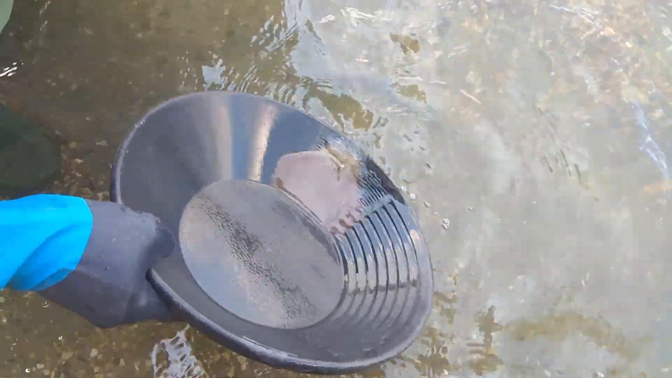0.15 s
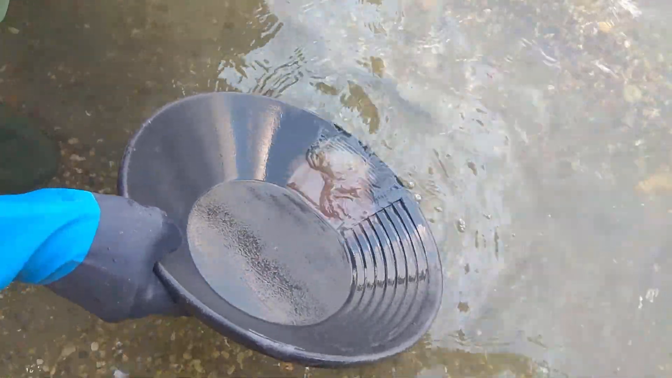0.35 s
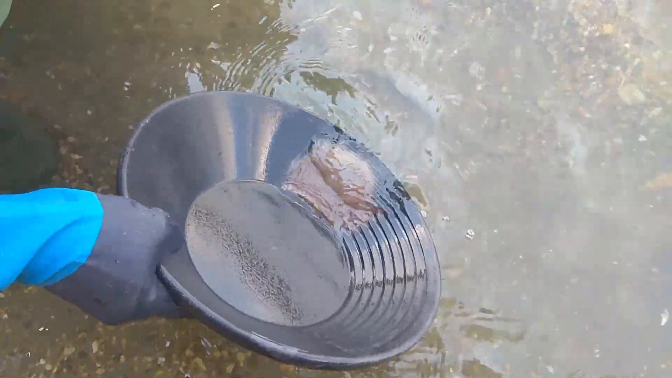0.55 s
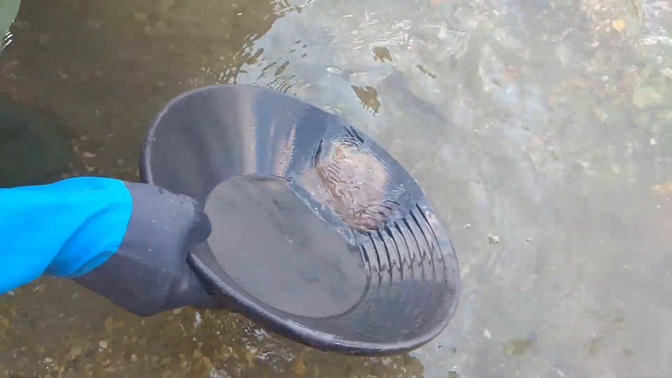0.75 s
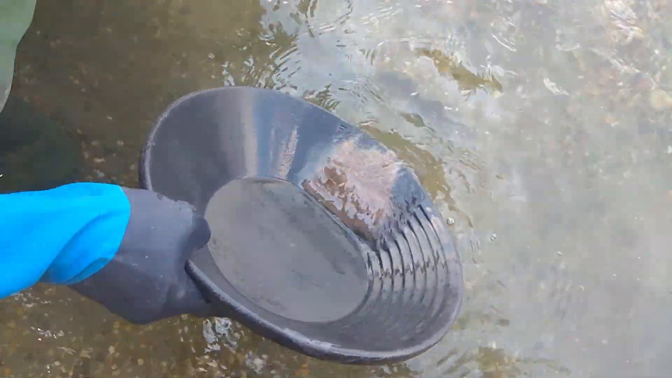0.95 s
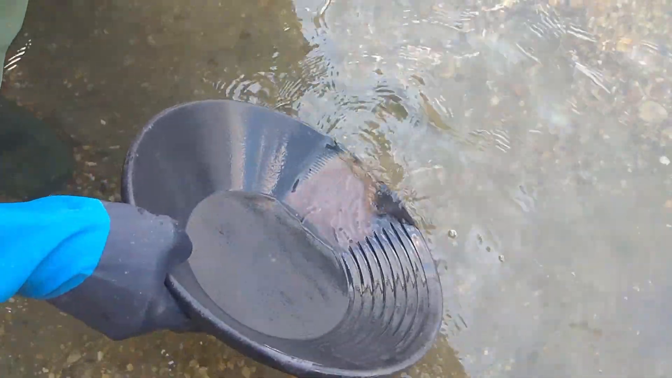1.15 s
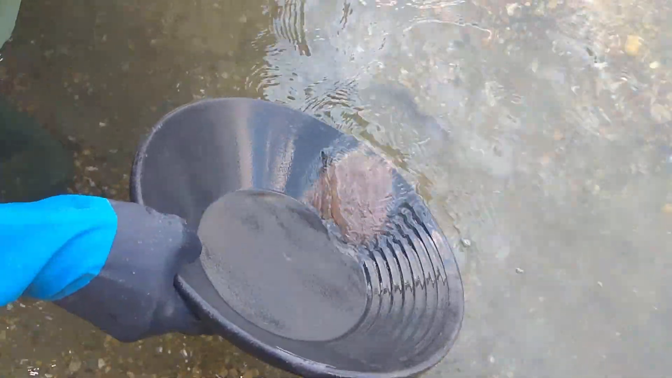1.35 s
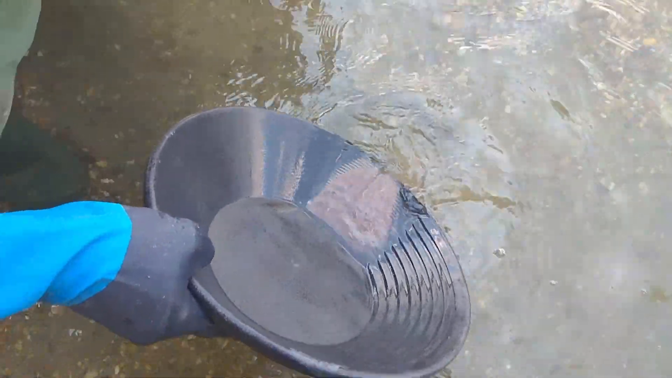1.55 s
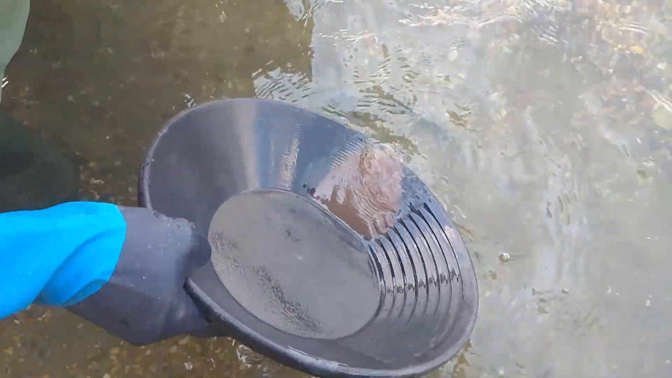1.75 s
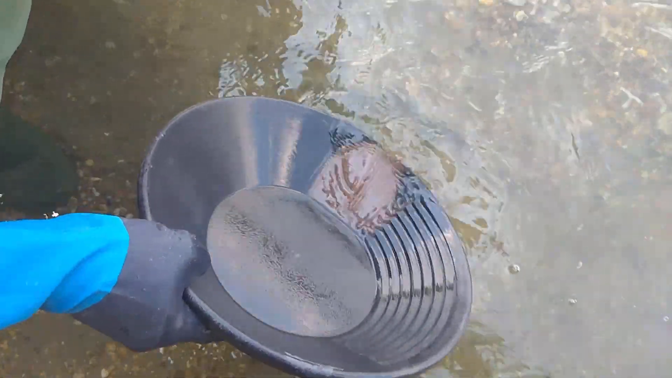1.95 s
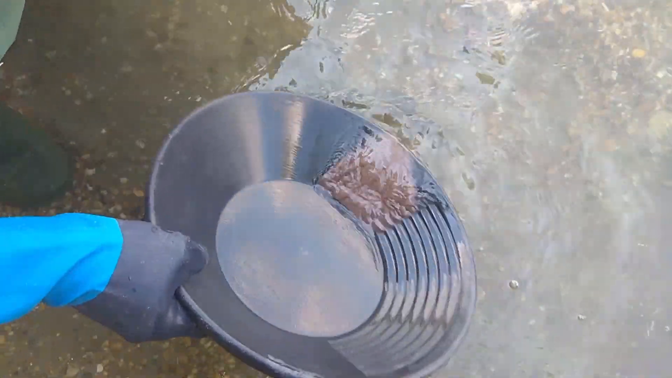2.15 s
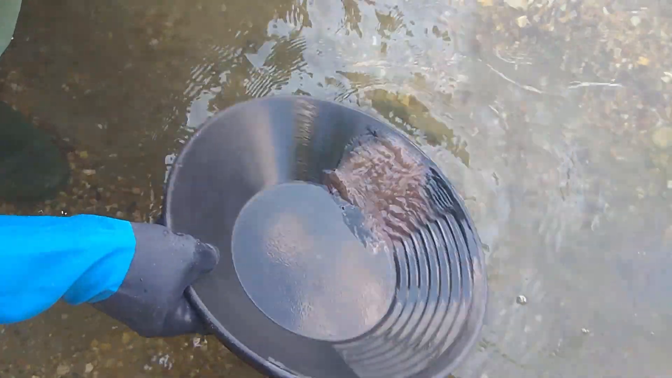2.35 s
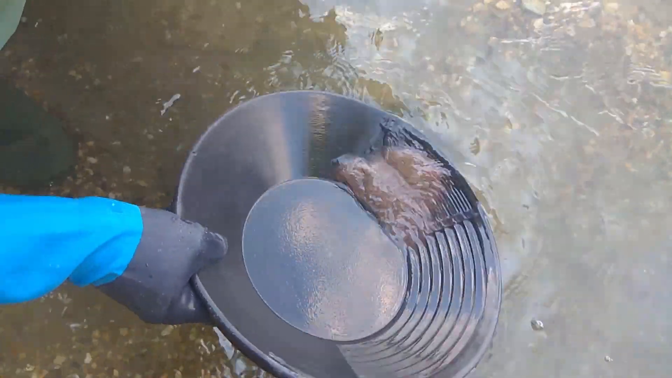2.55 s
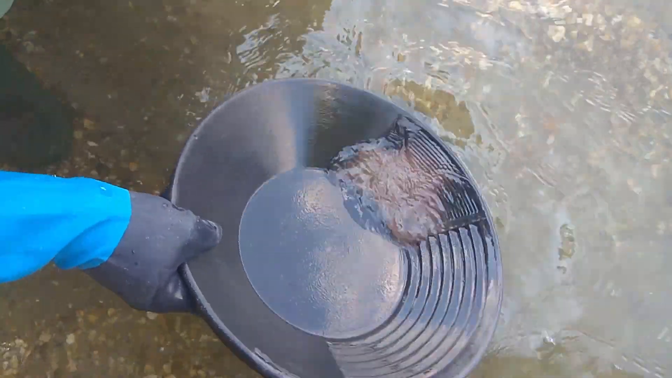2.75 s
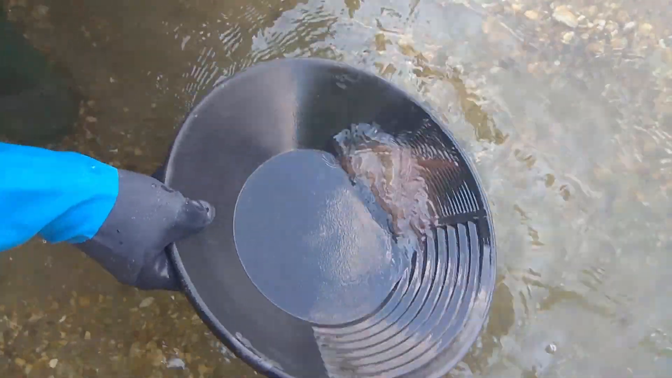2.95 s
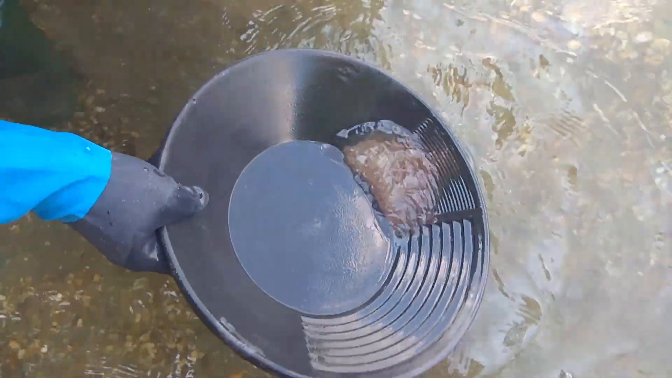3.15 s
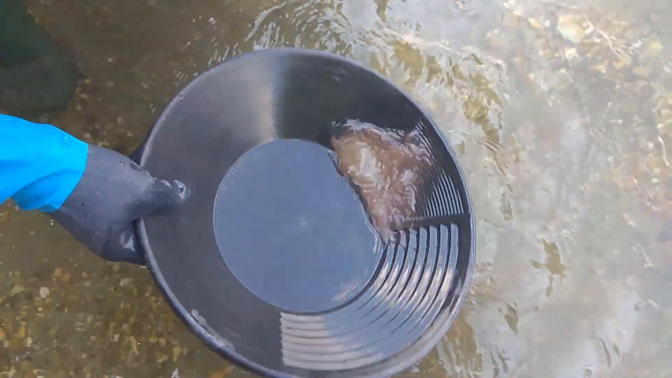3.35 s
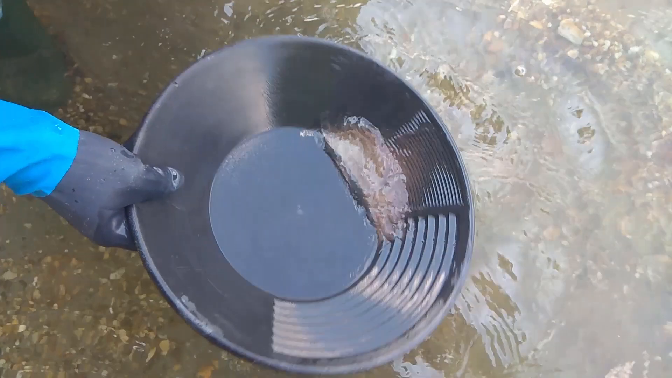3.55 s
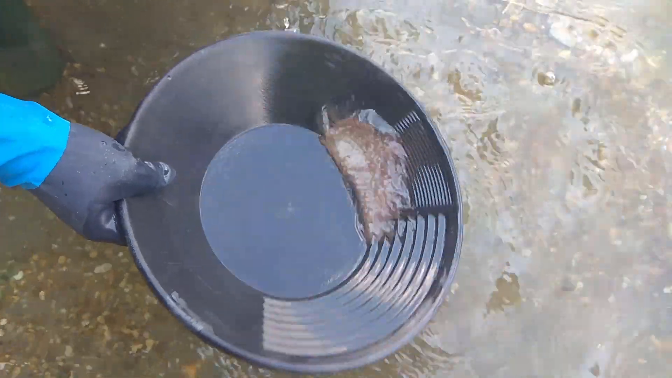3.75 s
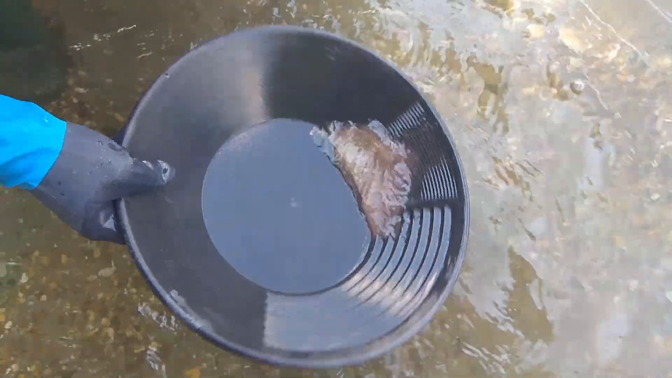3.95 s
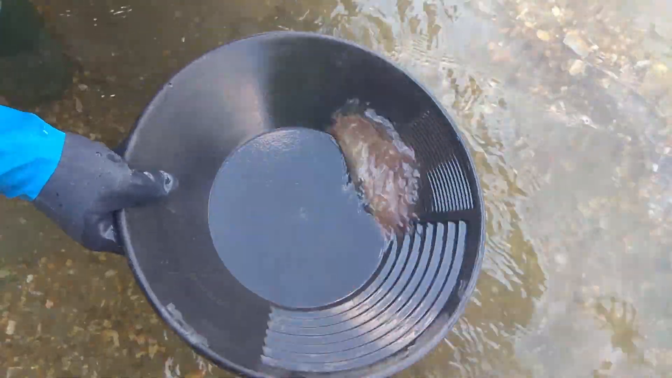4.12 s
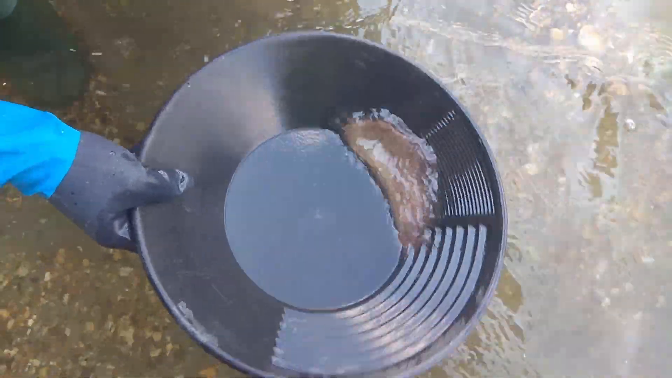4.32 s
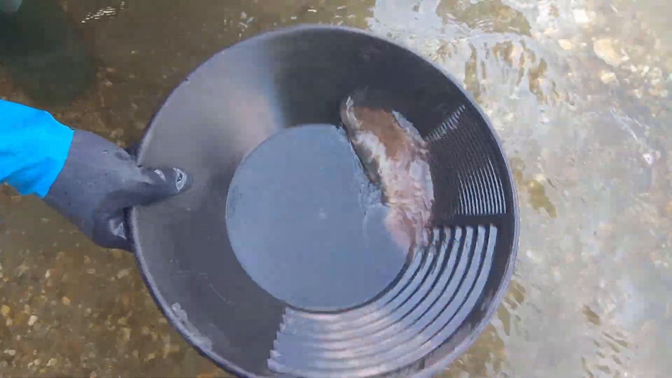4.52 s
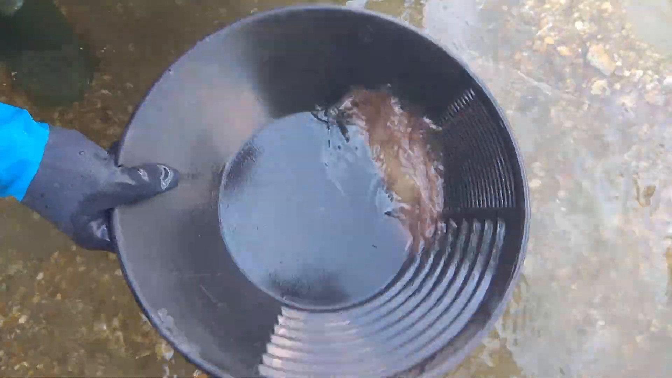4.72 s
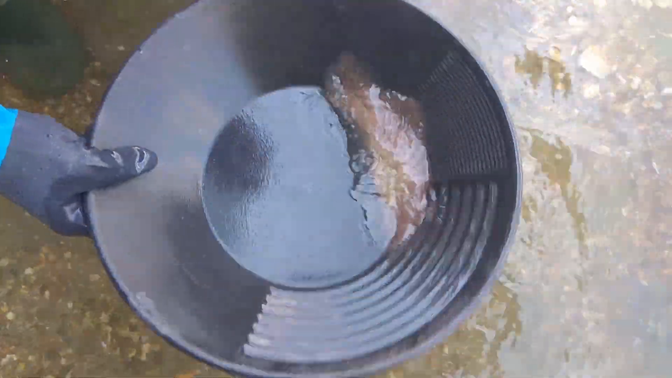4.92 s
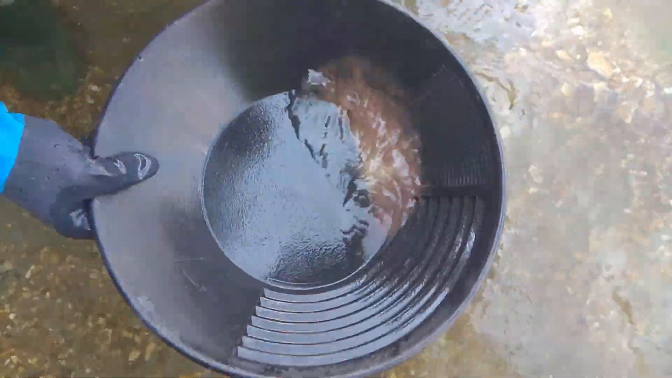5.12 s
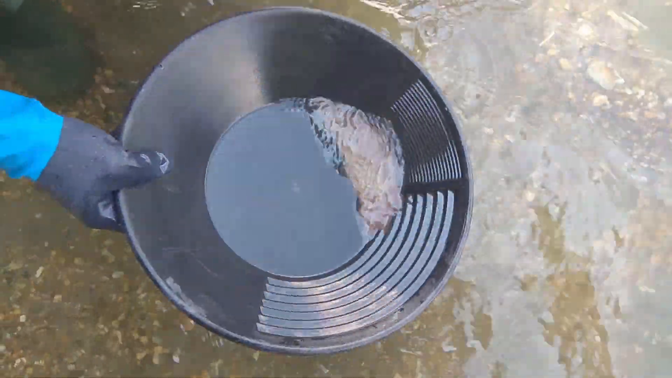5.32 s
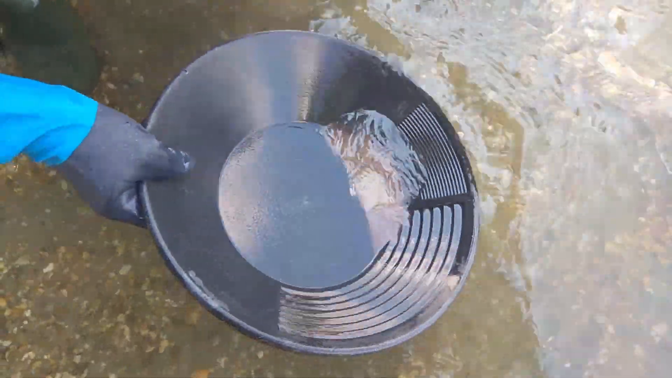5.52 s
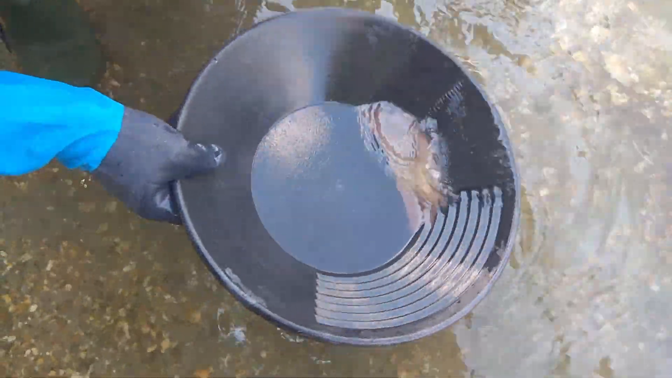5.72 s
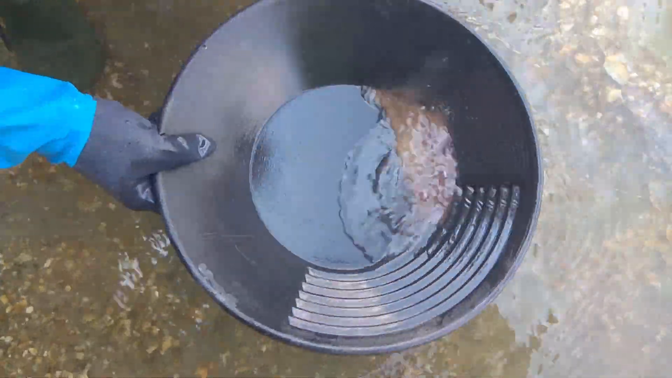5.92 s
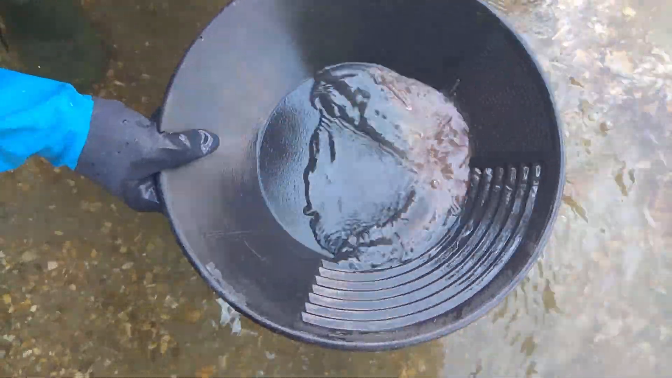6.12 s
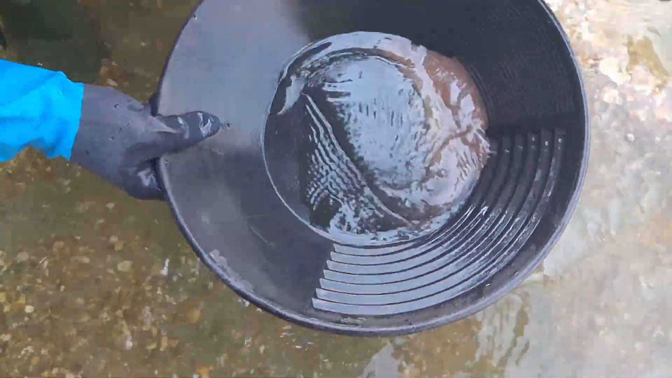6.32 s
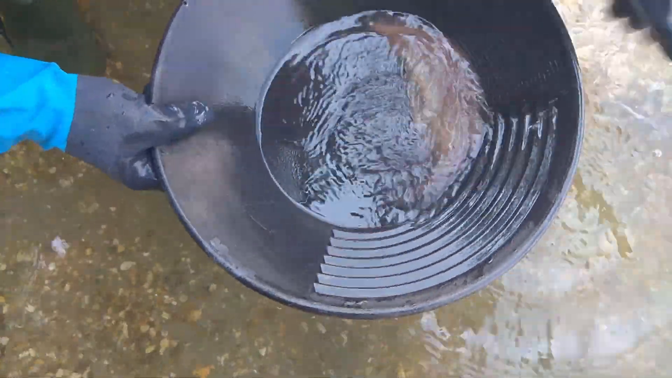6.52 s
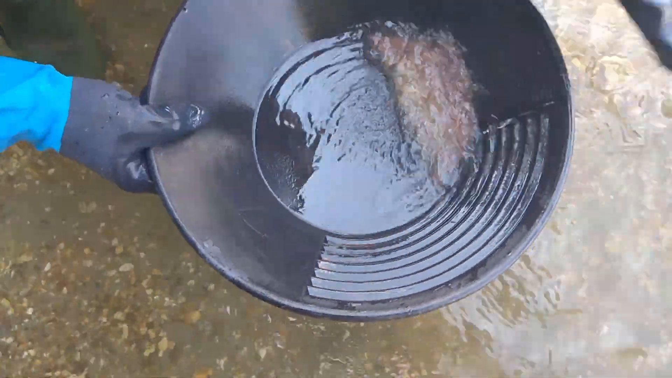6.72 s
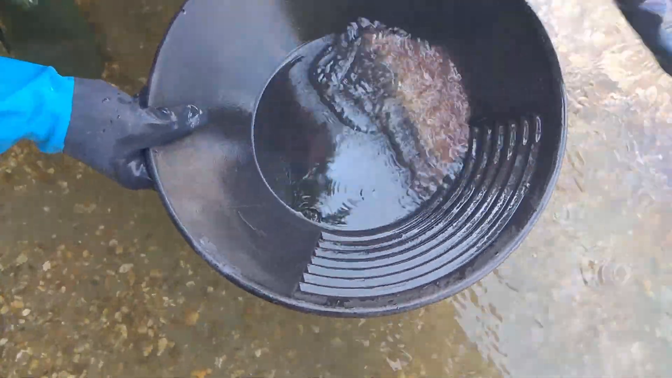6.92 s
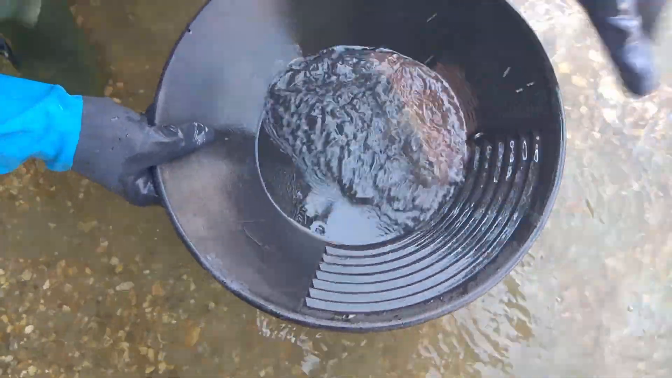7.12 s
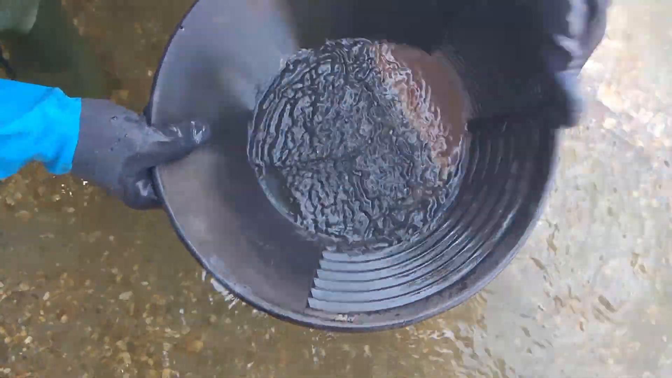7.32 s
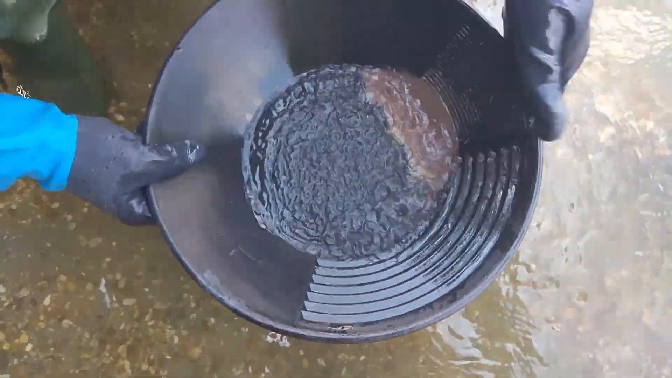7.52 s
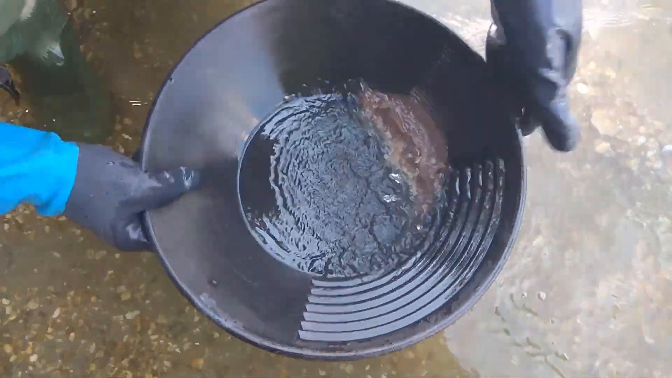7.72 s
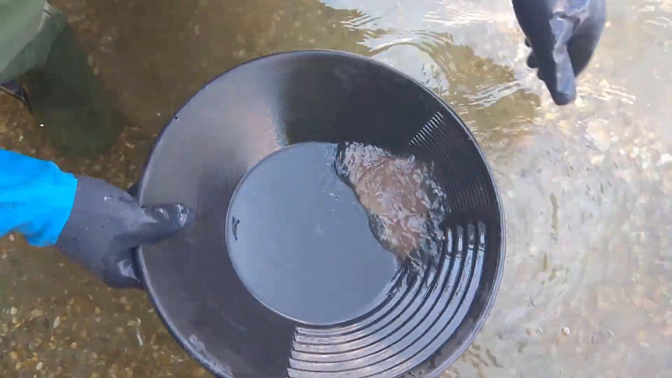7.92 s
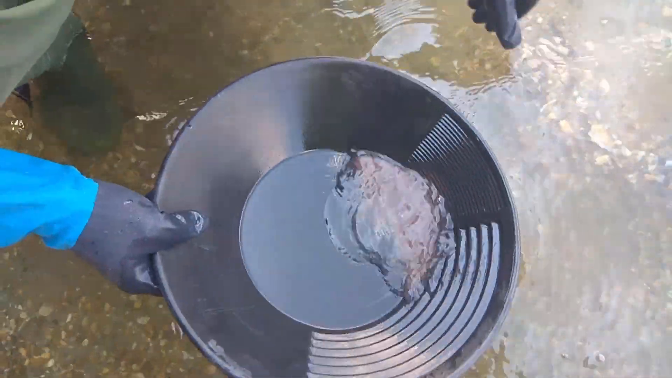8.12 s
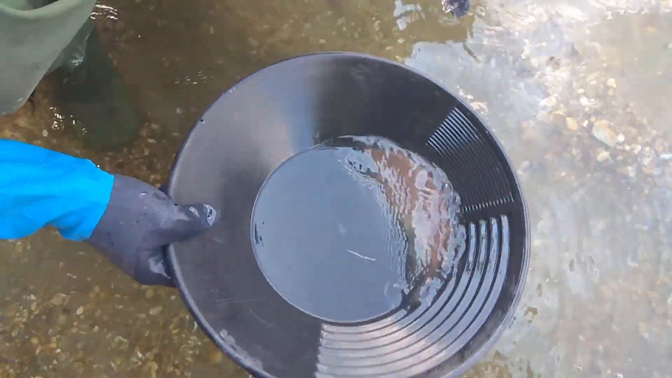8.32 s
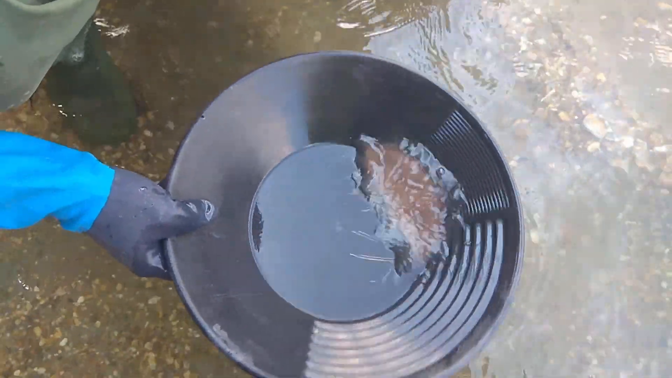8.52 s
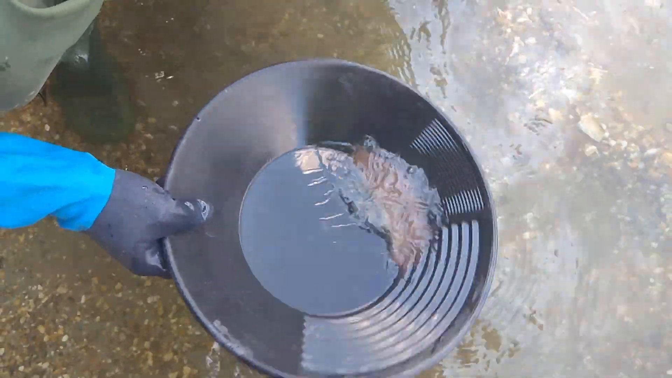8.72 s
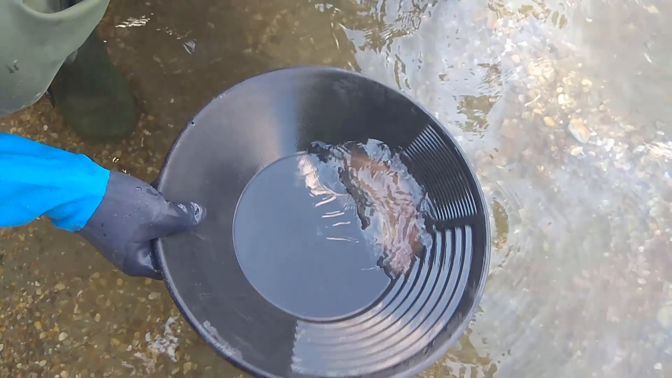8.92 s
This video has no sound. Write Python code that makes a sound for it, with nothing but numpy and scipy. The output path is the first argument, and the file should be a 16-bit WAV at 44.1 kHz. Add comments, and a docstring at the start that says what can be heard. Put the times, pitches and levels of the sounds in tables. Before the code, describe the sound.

A distant bird trills while water begins to lap at a plastic pan. A strong splash and gurgling, fizzing pours come first, then lighter plops, ringing bubbles and a quiet swirl of sand. Eight evenly spaced wet, hollow knocks on the rim shake water back into the pan, and gentle washes and drips end it. Outdoors on a shallow stream, heard very close in stereo.

```python
"""Water washes over the riffles of a plastic gold pan, spills, splashes and drips, close to a stereo microphone.
The pan is dipped and swirled in a shallow river: bubble clouds and spiky noise make the water, narrow noise the sand.
A wet gloved hand raps the rim eight times: slapped noise, ringing pan modes, then the slop of water falling back.
Underneath, the current rushes softly as low noise; far off, birds trill and whistle as gliding narrow noise."""
import sys
import numpy as np
from scipy import signal
from scipy.fft import rfft, irfft, next_fast_len
from scipy.io import wavfile
from scipy.ndimage import uniform_filter1d, map_coordinates

SR = 44100
rng = np.random.default_rng(int(sys.argv[2]) if len(sys.argv) > 2 else 0)


def inscribe(sig):
    """Save sig as 16-bit PCM at rate SR to the path in sys.argv[1].

    A 1-D sig is mono; a 2-D sig holds one channel per row.
    Samples are clipped to [-1, 1] before scaling.
    """
    pcm = np.round(np.clip(np.atleast_2d(sig).T, -1, 1) * 32767)
    wavfile.write(sys.argv[1], SR, pcm.astype(np.int16))


N = 399972

# Levels in the tables are settings; the functions trim or vary many of them. Waves over the riffles, most from
# a rock of the pan; the long one from 6.56 s is water stirred by the raps: (crest [s], rise [s], hold [s],
# level [dB], brightness [dB])
RIFFLE_WAVES = [(1.103, 0.14, 0.15, -47.5, -1), (1.384, 0.2, 0.044, -35, -6.5), (2.025, 0.11, 0.2, -46, -1),
                (2.352, 0.073, 0.086, -40.5, -3.5), (2.722, 0.2, 0.31, -52.5, -8),
                (3.466, 0.054, 0.036, -54, 1), (3.815, 0.066, 0.017, -59, 8.5),
                (5.302, 0.067, 0.0095, -43, 0.5), (5.446, 0.017, 0.015, -56, 10),
                (5.915, 0.0056, 0.0125, -55.5, 3.5), (6.063, 0.148, .2, -61.5, -2.5),
                (6.56, 0.12, 1.213, -70, 2.5), (7.759, 0.16, 0.032, -48.5, -5.5),
                (8.256, 0.1, 0.016, -91.5, 31), (8.796, 0.15, 0.08, -51, -0.5)]
RISE_DB, DRAIN_DB_PER_S = 19, 122  # climb within the rise time; fall after the hold
WAVE_GURGLE_DB, WAVE_FIZZ_DB = -14.5, -2  # against the babble; brightness trades gurgle for fizz
# Stream spilling over the lip while the pan is tipped: (time [s], flow [dB])
LIP_FLOW = [(0.92, -89.5), (1.02, -52), (1.27, -80), (1.4, -49.5), (2.6, -50), (3.15, -55.5), (4.14, -63.5),
            (4.42, -84)]
FULL_FLOW_DB = -50
POUR_BABBLE_DB, POUR_FIZZ_DB = -48.5, -60.5  # at full flow
BABBLE_GROWS, FIZZ_GROWS = 4.5, 0.55  # dB gained for each dB of flow
DROPLETS_DB = -3  # fine droplets against the wash that throws them
# Narrow bands of wash sliding down as a wave drains:
# (start [s], length [s], first pitch [Hz], last pitch [Hz], level [dB])
DRAINING_SLIDES = [(2.34, 0.33, 894.5, 576.6, -49), (2.6, 0.27, 3400, 2350, -48)]
SLIDE_WIDTH_HZ = 210
# Sand circling the pan floor: (time [s], level [dB])
SAND_LEVEL = [(4.2, -62), (5.8, -97), (6.1, -53), (6.45, -69), (7.82, -66.5), (8.2, -87), (8.6, -56.5)]
# Broad resonances of the dish: (centre [Hz], width [Hz], level [dB])
DISH_RESONANCES = [(1450, 190, 2), (2100, 260, -5), (3900, 600, -10)]
# Water slapping and dripping: (time [s], spray level [dB], body level [dB])
SPLASH_HITS = [(0.663, -29.5, -40), (1.1073, -19, -40), (1.1314, -22, -45.5), (1.217, -22, -56.5),
               (1.2455, -23, -51), (1.3221, -3, -12.5), (1.726, -42, -24.5), (1.8157, -26, -31),
               (2.0119, -15, -35.5), (2.3859, -13, -32.5), (2.5277, -16.5, -29), (2.7198, -23, -21.5),
               (2.875, -27.5, -28.5), (3.4252, -27, -40), (3.4498, -22.5, -46), (3.5637, -25, -40.5),
               (3.7247, -29, -38.5), (3.7956, -28, -43.5), (3.8288, -28.5, -30.5), (3.836, -23, -59),
               (3.906, -37.5, -37), (3.942, -32, -48), (4.0962, -39.5, -26.5), (4.8266, -33, -60),
               (5.34, -33.5, -32.5), (5.4611, -10.5, -20.5), (5.9653, -27, -35.5), (6.036, -18, -49),
               (6.353, -31, -95), (8.562, -21, -35.5), (8.5921, -24, -50), (8.8265, -23.5, -38.5),
               (8.861, -26.5, -36.5)]
# Small drops bursting on the plastic: (time [s], level [dB])
DROP_TICKS = [(0.275, -28), (1.1535, -25.5), (1.27, -23.5), (2.194, -25), (3.4857, -25), (3.9833, -23),
              (7.073, -27.5), (8.582, -29.5), (8.7567, -30), (8.988, -31)]
TICK_S = 0.0012  # time constant of a burst's decay
# Single ringing bubbles: (time [s], level [dB], starting pitch [Hz], 60 dB decay [s])
RINGING_BUBBLES = [(1.131, -25.5, 1990, 0.039), (1.189, -24, 3660, 0.019), (1.82, -25, 1220, 0.042),
                   (2.198, -29.5, 1107, 0.048), (2.386, -23.5, 414, 0.018), (3.453, -24.5, 3860, 0.026),
                   (3.748, -26.5, 2050, 0.021), (4.004, -28, 626, 0.04), (4.005, -24, 1180, 0.016),
                   (4.007, -27, 1830, 0.025), (4.237, -37, 4700, 0.017), (5.311, -40, 847, 0.057),
                   (5.464, -21, 2070, 0.026), (5.93, -35.5, 768, 0.14), (5.933, -37.5, 1650, 0.079),
                   (5.969, -34, 1310, 0.079), (6.113, -38, 4290, 0.03), (6.355, -34.5, 2414, 0.039),
                   (6.771, -29, 2370, 0.017), (8.401, -37, 4300, 0.0075), (8.473, -45, 1340, 0.079),
                   (8.507, -38.5, 1400, 0.017), (8.728, -30.5, 3400, 0.006), (8.828, -38.5, 890, 0.11),
                   (8.872, -35, 850, 0.026)]
# Raps on the rim: (time [s], smack level [dB], thump level [dB], slop level [dB], slop pitch [Hz])
RIM_RAPS = [(6.5105, -12, -21.5, -32.5, 657), (6.689, -7, -16, -35.5, 639), (6.847, -4.5, -10, -27.5, 706),
            (7.024, -6.5, -8.5, -30.5, 650), (7.194, -3, -6, -39.5, 748), (7.368, -8, -7, -21, 670),
            (7.538, -3.5, -5.5, -18, 647), (7.701, -5.5, -4, -18, 680)]
# Wet pan modes, before each rap's variation: (pitch [Hz], level [dB], 60 dB decay [s])
PAN_MODES = [(213.7, -14, 0.16), (279, 7, 0.025), (299.6, -9, 0.022), (526, 4.5, 0.018), (897, -10, 0.034),
             (1181, -2, 0.019), (1510, -7, 0.011)]
RAP_SPRAY_DB = -36  # spray falling back after every rap
# The river's low rush: (time [s], level [dB])
CURRENT_LEVEL = [(0.0, -52), (1.36, -48), (2.37, -61), (3.0, -46), (3.28, -56), (5.53, -46), (6.46, -54.5),
                 (6.72, -46), (7.63, -52.5), (7.96, -66.5), (8.92, -78.5), (9.05, -60)]
BLIPS_DB = -79  # ripples plipping round the pan
# Thin far bird whistles: (start [s], length [s], first pitch [Hz], last pitch [Hz], level [dB])
BIRD_WHISTLES = [(0, 0.21, 2154, 2220, -57.5), (3.13, 0.36, 3540, 4160, -67.5),
                 (4.404, 0.16, 1896, 2300, -67.5), (4.97, 0.16, 2650, 2220, -72),
                 (8.027, 0.34, 7860, 7500, -58)]
FIRST_NOTE_S, NOTE_S = 0.07, 0.212  # a trill note's start; spacing of the notes
TRILL_DB, TRILL_END_S = -52, 0.97  # the trill's fade starts at its end time

# Large bubbles, the gurgle's spectrum: (frequency [Hz], relative level [dB])
GURGLE_SPECTRUM = [(100, -23), (250, 2), (450, -5.5), (700, 0), (1200, -5.5), (1800, -26.5), (3500, -35)]
# Middling bubbles, the babble's spectrum: (frequency [Hz], relative level [dB])
BABBLE_SPECTRUM = [(600, -27), (1400, -7.5), (2200, -0.5), (3200, 0.5), (4800, 3.5), (7000, -28),
                   (12000, -31)]
# Tiny bubbles, the fizz's spectrum: (frequency [Hz], relative level [dB])
FIZZ_SPECTRUM = [(2500, -52.5), (5000, -3), (7000, -0.5), (9500, 4.5), (12000, -9), (14500, 1.5),
                 (16500, -28)]
# Hollow body of a splash: (frequency [Hz], relative level [dB])
BODY_SPECTRUM = [(100, -29), (300, -9.5), (600, -3), (1200, -6.5), (2100, 1.5), (3000, -9), (5000, -9),
                 (12000, -62.5)]
# Bright spray of splashes and drops: (frequency [Hz], relative level [dB])
SPRAY_SPECTRUM = [(1000, -39), (2800, -6), (5000, -4), (9000, 3.5), (12000, -5), (15000, -13.5),
                  (17000, -40)]
# Wet glove on the rim: (frequency [Hz], relative level [dB])
SMACK_SPECTRUM = [(150, -30), (500, 0.5), (1200, -10), (2200, -3.5), (3500, -15.5), (6000, -11),
                  (9000, -8.5), (12000, -14.5), (16000, -22.5)]
# Low rush of the current: (frequency [Hz], relative level [dB])
RUSH_SPECTRUM = [(20, -31), (60, -26.5), (115, -4), (180, 1), (240, -5.5), (320, -27.5), (600, -55)]
# Far ripples: (frequency [Hz], relative level [dB])
FAR_RIPPLE_SPECTRUM = [(500, -2), (1500, -4.5), (5000, -26), (15000, -24.5)]
# Echo blur of the bird trill: (frequency [Hz], relative level [dB])
TRILL_SPECTRUM = [(1600, -55), (2500, -22), (3500, -10), (4400, -16.5), (5400, -29.5), (9000, -56)]
# Microphone's left port over its right for a sound on the left: (frequency [Hz], difference [dB])
LEFT_OVER_RIGHT = [(300, -1.4), (700, 0.8), (1400, 4), (3000, 7.5), (9000, 9)]
TOP_HZ = 16400  # microphone's band limit


def wash():
    """Water over the riffles: bubbles of three sizes on dense spatter, and a prickle of droplets."""
    gurgle_gain, babble_gain, fizz_gain = np.hypot(pour(), waves())
    ripple = wobble(45)  # each wavelet lifts all sizes at once

    gurgle = coloured(froth(rate=550, hz=786, spread=1.2, cycles=34, size_db=7, size=1200), GURGLE_SPECTRUM)
    gurgle = gurgle + spatter(N, GURGLE_SPECTRUM, spiky=0.6, apart=0.4)
    babble = coloured(froth(rate=900, hz=1900, spread=1, cycles=28, size_db=5.5, size=600), BABBLE_SPECTRUM)
    babble = babble + 0.75 * spatter(N, BABBLE_SPECTRUM, spiky=0.6, apart=0.9)
    fizz = coloured(froth(rate=1300, hz=8000, spread=.8, cycles=15, size_db=6, size=100), FIZZ_SPECTRUM)
    fizz = fizz + spatter(N, FIZZ_SPECTRUM, spiky=0.5, apart=1)
    strikes = (rng.random(N) < 70 / SR) * amp(5 * rng.standard_normal(N))  # about 70 a second
    droplets = patchy(bursts(strikes), depth_db=7)

    water = unit(gurgle) * gurgle_gain * amp(2 * ripple)
    water += patchy(babble, depth_db=3.5) * babble_gain * amp(2 * ripple - 2)
    water += patchy(fizz, depth_db=4) * fizz_gain * amp(2 * ripple + 1)
    water += droplets * np.hypot(babble_gain / 2, fizz_gain) * amp(DROPLETS_DB)
    return ports(water + glides(DRAINING_SLIDES, SLIDE_WIDTH_HZ), lag_ms=0.08, left=0.98)


def waves():
    """Gains of gurgle, babble and fizz as each wave swells, holds and drains."""
    t = np.arange(0, N, 64) / SR
    power = 0
    for crest, rise, hold, db, bright_db in RIFFLE_WAVES:
        climb = RISE_DB * np.maximum(crest - t, 0) / rise
        drain = DRAIN_DB_PER_S * np.maximum(t - crest - hold, 0)
        balance = np.array([[WAVE_GURGLE_DB - bright_db], [0], [WAVE_FIZZ_DB + bright_db]])
        power = power + amp(db - climb - drain + balance) ** 2
    return np.array([np.interp(np.arange(N) / SR, t, np.sqrt(p)) for p in power])


def pour():
    """Gains of gurgle, babble and fizz in the spilling stream: only a full flow babbles."""
    flow_db, = curves(LIP_FLOW)
    over_db = flow_db - FULL_FLOW_DB
    babble_db = POUR_BABBLE_DB + BABBLE_GROWS * over_db
    fizz_db = POUR_FIZZ_DB + FIZZ_GROWS * over_db
    return amp([flow_db, babble_db, fizz_db]) * within(LIP_FLOW, fade=0.057)


def swirl():
    """Sand and a water film rub the floor; the dish's resonances wander and break as water shifts."""
    murmur = 0
    for hz, width_hz, db in DISH_RESONANCES:
        level = amp(db + 4 * wobble(18))
        murmur = murmur + level * rustle(hz * (1 + 0.06 * wobble(14)), width_hz)
    gain = amp(curves(SAND_LEVEL)[0] - 5) * within(SAND_LEVEL, fade=0.16)
    return ports(patchy(murmur, depth_db=4) * gain, lag_ms=0)


def splashes():
    """Clustered slaps throw bright spray over a hollow, bubbly body; big ones trail more droplets."""
    out, t = np.zeros((2, N)), np.arange(SR // 6) / SR
    for s, spray_db, body_db in SPLASH_HITS:
        landing = slaps(t, lead=0.0019, spread=0.0037, t60=0.016, count=3)
        trail = amp(0.05 * max(spray_db, body_db) - 15.5) * burst(t, 0.002, 0, t60=0.32)
        envelope = landing + trail
        spray = patchy(spatter(len(t), SPRAY_SPECTRUM, spiky=0.11, apart=1), depth_db=3.5) * envelope
        body = spatter(len(t), BODY_SPECTRUM, spiky=0.18, apart=0.42) * envelope
        plop = amp(body_db - 9) * pockets(t, hz=1150, octaves=1, span=0.012, t60=0.04, count=4)
        splash = amp(spray_db - 26.5) * unit(spray) + amp(body_db - 23.0) * unit(body) + plop
        add(out, s - .0005, ports(splash, lag_ms=0.095 * rng.standard_normal(), left=0.55))
    return out


def ticks():
    """Single drops burst sharply on the plastic."""
    strikes = np.zeros(N)
    for s, db in DROP_TICKS:
        strikes[round(s * SR)] = amp(db - 4.5)
    return ports(bursts(strikes), lag_ms=0, left=.5)


def bubbles():
    """Drops land with a rough tick and trap single bubbles that ring out."""
    out, t = np.zeros(N), np.arange(SR // 8) / SR
    for s, db, hz, t60 in RINGING_BUBBLES:
        tick = rustle(np.full(len(t), hz), width_hz=0.3 * hz) * burst(t, 0.0008, 0, t60=0.035)
        add(out, s, amp(db - 1.5) * (bubble(t, hz, t60, glide=0.1) + 0.35 * tick))
    return ports(out, lag_ms=0.058)


def raps():
    """The wet glove smacks the rim, the pan thumps, and thrown water slops and rattles back."""
    out, t = np.zeros((2, N)), np.arange(SR // 5) / SR
    for s, smack_db, thump_db, slop_db, slop_hz in RIM_RAPS:
        fingers = slaps(t, lead=0.0021, spread=0.0051, t60=0.02, count=4)
        fingers = fingers + amp(-26.5) * burst(t, 0.0067, 0, t60=0.49)
        smack = patchy(spatter(len(t), SMACK_SPECTRUM, spiky=0.046, apart=1.0), depth_db=5.5) * fingers

        fall = np.exp(-.5 * ((t - .0285) / 0.004) ** 2)
        second_phase = slop_hz * 1.25 * t + rng.random()
        # two air pockets beat
        cavity = np.sin(2 * np.pi * slop_hz * t) + 0.37 * np.sin(2 * np.pi * second_phase)
        spray = patchy(spatter(len(t), SMACK_SPECTRUM, spiky=0.38, apart=0.75), depth_db=4.0)
        spray = spray * np.exp(-.5 * ((t - .028) / 0.013) ** 2)
        wet = amp(smack_db - 26.0) * unit(smack) + amp(slop_db + 1.5) * fall * cavity
        add(out, s - .0012, ports(wet + amp(RAP_SPRAY_DB) * spray, lag_ms=-0.22, left=0.3))

        rattle = pockets(t, hz=1000, octaves=1.2, span=0.034, t60=0.01, count=36)
        add(out, s + 0.011, ports(amp(smack_db - 25) * rattle, lag_ms=0))
        add(out, s + .0014, ports(amp(thump_db - 3.5) * pan_thump(t), lag_ms=-0.12, left=0.73))
    return out


def pan_thump(t):
    """Struck pan modes decay together; little deep bass sounds beneath them."""
    load = 1 + 0.019 * rng.standard_normal()  # the shifting water retunes the pan
    thump = 0
    for hz, db, t60 in PAN_MODES:
        decay = amp(db + rng.normal(0, 4.25) - 60 * t / t60)
        thump = thump + decay * np.sin(2 * np.pi * hz * load * t)
    return filtered(thump * (1 - np.exp(-t / 0.0024)), lambda hz: (1j * hz / (1j * hz + 70)) ** 2)


def river():
    """The current's low, lumpy rush, the faint hiss of far ripples and small blips nearer by."""
    rush = patchy(spatter(N, RUSH_SPECTRUM, spiky=0, apart=0.13), depth_db=2.5, size=4096)
    rush = rush * amp(curves(CURRENT_LEVEL)[0] + 1.5)
    ripples = patchy(spatter(N, FAR_RIPPLE_SPECTRUM, spiky=0, apart=1), depth_db=6)
    blips = unit(froth(rate=26, hz=1900, spread=1.3, cycles=60, size_db=3, size=2000))
    return rush + amp(-81.5) * ripples + amp(BLIPS_DB) * blips


def birds():
    """A far trill of falling chirrs that soon blur into their own echoes, and a few thin whistles."""
    t = np.arange(N) / SR
    note = ((t - FIRST_NOTE_S) / NOTE_S) % 1  # position within a note
    pitch_hz = 2600 + 1800 * np.exp(-note / 0.22)
    chirrs = unit(rustle(pitch_hz, width_hz=200) * burst(note, 0.04, 0, t60=1.8))
    echoes = patchy(spatter(N, TRILL_SPECTRUM, spiky=0, apart=1.0), depth_db=3)
    trill = amp(-3 - 9 * t) * chirrs + 0.9 * echoes
    song = trill * amp(TRILL_DB) * np.clip(1 - (t - TRILL_END_S) / 0.4, 0, 1)
    return ports(song + glides(BIRD_WHISTLES, width_hz=65), lag_ms=0)


def froth(rate, hz, spread, cycles, size_db, size):
    """A stereo cloud of bubbles of random pitch, life and strength, each at its own place."""
    count = int(rate * N / SR)
    when, pitch, life, strength, place = rng.random((count, 5)).T[..., None]
    f = hz * 2 ** (spread * (2 * pitch - 1))
    t = np.arange(size) / SR
    t60 = np.minimum(cycles * 2 ** (2 * life - 1) / f, size / SR)
    rarity = -np.log(strength + .02)  # strong bubbles are rare
    rings = bubble(t, f, t60, glide=0.18) * amp(size_db * rarity)
    shifts = np.round((place - .5) * 5).astype(int)  # samples between the ports, halved
    at = (when * N).astype(int) + np.arange(size) + 8
    return np.array([np.bincount((at + side * shifts).ravel(), rings.ravel(), N)[:N] for side in (1, -1)])


def bubble(t, hz, t60, glide):
    """A bubble rings at its size's pitch, which rises as it nears the surface."""
    ring = np.sin(2 * np.pi * hz * t * (1 + glide * t / t60 / 2))
    return ring * amp(-60 * t / t60) * (1 - np.exp(-t * hz))


def pockets(t, hz, octaves, span, t60, count):
    """Air pockets of mixed size, trapped at scattered moments, at peak 1."""
    when, pitch, strength = rng.random((count, 3)).T[..., None]
    pitch_hz = hz * 2 ** (octaves * (2 * pitch - 1))
    rings = bubble(np.maximum(t - span * when, 0), pitch_hz, t60, glide=0.07)
    cluster = np.sum(strength * rings, axis=0)
    return cluster / np.abs(cluster).max()


def spatter(n, spectrum, spiky, apart):
    """Stereo noise made of uneven micro-impacts; a share differs between the ports."""
    x = rng.standard_normal(n) + apart * rng.standard_normal((2, n))
    return coloured(x * np.exp(spiky * rng.standard_normal(n)), spectrum)


def bursts(strikes):
    """Every strike lets off about a millisecond of bright spray."""
    envelope = signal.lfilter([1], [1, -np.exp(-1 / (TICK_S * SR))], strikes)
    return envelope * spatter(N, SPRAY_SPECTRUM, spiky=0, apart=0.98)


def slaps(t, lead, spread, t60, count):
    """Envelope of water landing in pieces: a soft first touch, the main slap, then weaker ones."""
    starts = lead + spread * np.append(0, rng.uniform(0.06, 1, count - 1))
    since = t - starts[:, None]
    pieces = (since > 0) * amp(-60 * np.abs(since) / t60) / np.sqrt(np.arange(count) + 1)[:, None]
    touch = 0.75 * np.minimum(t / lead, 1) * np.exp(-t / spread)
    return np.sqrt(np.sum(pieces ** 2, axis=0) + touch ** 2)


def burst(t, rise, hold, t60):
    """Envelope that rises softly, holds and dies."""
    return (1 - np.exp(-t / rise)) ** 2 * amp(-60 * np.maximum(t - hold, 0) / t60)


def rustle(hz, width_hz):
    """Narrow noise of rms 1 round a moving centre pitch."""
    a, b = filtered(rng.standard_normal((2, len(hz))), lambda f: np.exp(-.5 * (f / width_hz) ** 2))
    phase = 2 * np.pi * np.cumsum(hz) / SR
    return unit(a * np.cos(phase) + b * np.sin(phase))


def glides(rows, width_hz):
    """Bands that swell, flutter and fade as they slide from one pitch to another."""
    out = np.zeros(N)
    for s, length, first_hz, last_hz, db in rows:
        u = np.minimum(np.arange(SR // 2) / SR / length, 1)
        band = rustle(first_hz + (last_hz - first_hz) * u, width_hz)
        add(out, s, amp(db) * band * np.abs(np.sin(np.pi * u)) ** .5)
    return out * amp(3 * wobble(35) - 1)


def patchy(x, depth_db, size=512):
    """Ever-changing bands rise and fall at random, as gaps and pockets in moving water favour them; rms 1."""
    z = signal.stft(x, nperseg=size)[2]
    field = uniform_filter1d(rng.standard_normal(z.shape[-2:]), size=3, axis=0)
    field = uniform_filter1d(field, size=3, axis=1)
    return unit(signal.istft(z * amp(depth_db * unit(field)), nperseg=size)[1][..., :x.shape[-1]])


def ports(x, lag_ms, left=1):
    """At positive settings, sound reaches the microphone's left port first and with more treble."""
    side = np.array([[.5], [-.5]])

    def response(hz):
        tilt = amp(side * left * along(LEFT_OVER_RIGHT, hz))
        return tilt * np.exp(2j * np.pi * hz * side * lag_ms / 1000)
    return filtered(x, response)


def coloured(x, spectrum):
    """x shaped by a spectrum, at rms 1."""
    return unit(filtered(x, lambda hz: amp(along(spectrum, hz))))


def filtered(x, response):
    """x times a complex response of frequency."""
    n = x.shape[-1]
    m = next_fast_len(n + 2048)  # padding for the tail
    return irfft(rfft(x, m) * response(np.fft.rfftfreq(m, 1 / SR)), m)[..., :n]


def wobble(rate):
    """A smooth random curve, rate knots a second."""
    return map_coordinates(rng.standard_normal(int(N * rate / SR) + 4), [np.arange(N) * rate / SR])


def curves(rows):
    """One value per sample for each column after the time."""
    s, *cols = np.transpose(rows)
    return [np.interp(np.arange(N) / SR, s, c) for c in cols]


def within(rows, fade):
    """1 while a table runs, fading to 0 outside."""
    t = np.arange(N) / SR
    return np.clip(1 + np.minimum(t - rows[0][0], rows[-1][0] - t) / fade, 0, 1)


def along(points, hz):
    """Values between (Hz, value) points on a log-frequency axis."""
    f, v = np.transpose(points)
    return np.interp(np.log(hz + 1), np.log(f + 1), v)


def add(out, s, x):
    """Mix x into out from time s."""
    i = max(round(s * SR), 0)
    out[..., i:i + x.shape[-1]] += x[..., :out.shape[-1] - i]


def amp(db):
    """Decibels to gain."""
    return 10 ** (np.asarray(db) / 20)


def unit(x):
    """x at rms 1."""
    return x / np.sqrt(np.mean(x ** 2) + 1e-20)


def scene():
    """Everything heard beside the pan, from the near water to the far birds."""
    return wash() + swirl() + splashes() + ticks() + bubbles() + raps() + river() + birds()


def record(dry):
    """The microphone keeps nothing above its band limit."""
    return filtered(dry, lambda hz: hz < TOP_HZ)


dry = scene()
out = record(dry)
inscribe(out)
```